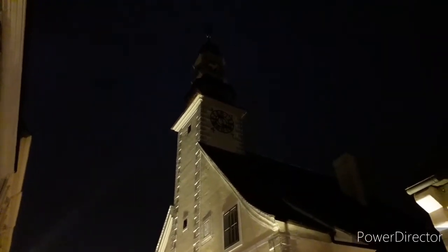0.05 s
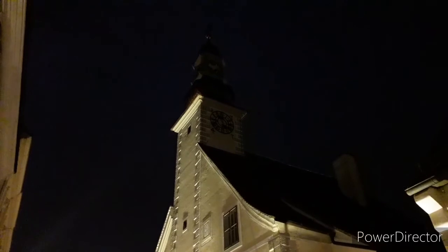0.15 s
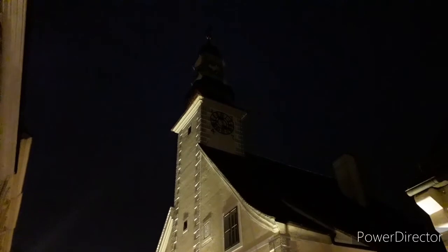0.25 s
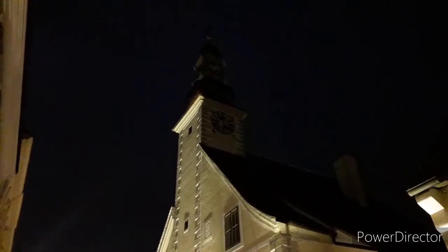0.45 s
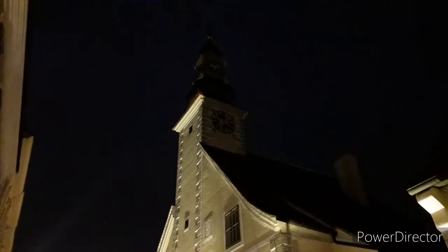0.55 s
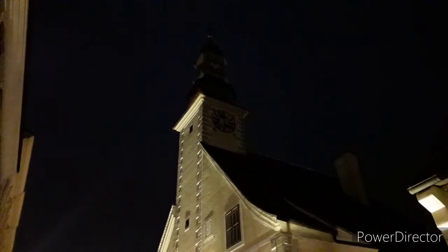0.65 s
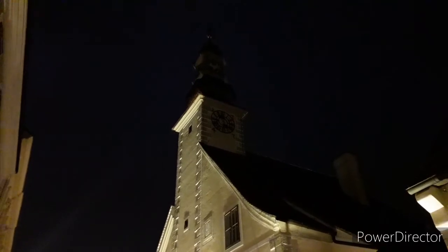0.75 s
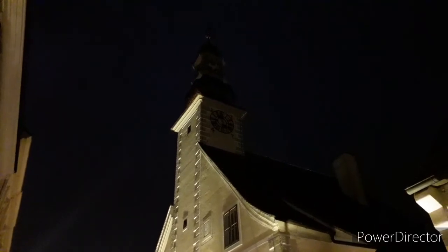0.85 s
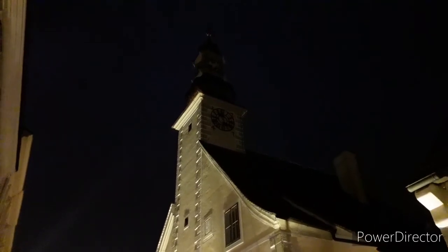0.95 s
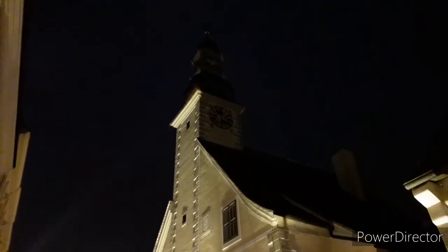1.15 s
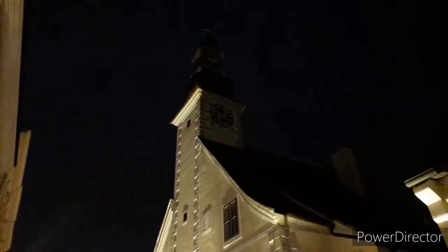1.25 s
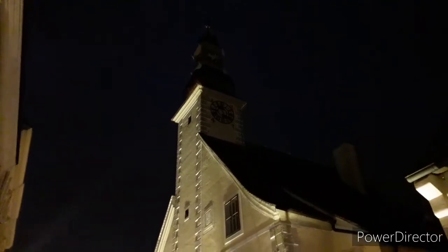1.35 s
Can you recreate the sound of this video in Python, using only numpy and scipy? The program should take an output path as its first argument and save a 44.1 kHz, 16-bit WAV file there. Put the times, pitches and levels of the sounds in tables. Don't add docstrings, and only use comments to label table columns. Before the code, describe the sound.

One hard hammer blow on a church bell, its shimmering ring fading into faint town hush

```python
import sys
import numpy as np
from scipy import signal
from scipy.fft import rfft, irfft
from scipy.io import wavfile
from scipy.ndimage import uniform_filter1d, minimum_filter1d

SR = 44100
rng = np.random.default_rng(int(sys.argv[2]) if len(sys.argv) > 2 else 0)


def elevation(decibels):
    levels = np.asarray(decibels, float)
    return 10 ** (levels / 20)


def master(y):
    cut = np.clip(np.atleast_2d(y).T, -1, 1)
    pcm = np.round(cut * 32767)
    wavfile.write(sys.argv[1], SR, pcm.astype(np.int16))


N = 61739
STRIKE_S, EARLY_S, RISE_S = .2119, .2024, .0014


def read(points, hz):
    f, value = np.transpose(points)
    return np.interp(np.log(hz + 1), np.log(f + 1), value)


def colour(x, points):
    hz = np.fft.rfftfreq(len(x), 1 / SR)
    y = irfft(rfft(x) * elevation(read(points, hz)), len(x))
    return y / np.sqrt(np.mean(y ** 2))


def passed(x, hz, kind, order):
    return signal.sosfilt(signal.butter(order, hz, kind, fs=SR, output="sos"), x)


def since(s):
    return np.maximum(np.arange(N) / SR - s, 0)


def decay(t, db, t60):
    return elevation(db - 60 * t / t60)


def partials(pitches, table):
    hold_s, bloom_depth, twin_gain_db_per_s = .1, .88, 10
    echo_db, echo_end_s, echo_fade_s = -3, .14, .04
    t, out = since(STRIKE_S), np.zeros(N)
    late = np.maximum(t - hold_s, 0)
    starts = rng.uniform(0, 2 * np.pi, len(table))
    for hz, (db, t60, split, share, bloom), start in zip(pitches, table, starts):
        phase = 2 * np.pi * hz * t + start
        twin_level = np.tanh(share * elevation(twin_gain_db_per_s * t))
        twin = twin_level * np.sin(phase + 2 * np.pi * split * t)
        swell = 1 - bloom_depth * np.exp(-t / bloom)
        out += np.sqrt(2) * decay(late, db, t60) * swell * (np.sin(phase) + twin)
    echoes_end = elevation(echo_db * np.clip((t - echo_end_s) / echo_fade_s, 0, 1))
    return out * np.minimum(t / RISE_S, 1) ** 2 * echoes_end


# f/Hz, level/dB
SWARM = [(300, -50.5), (1800, -55), (2300, -53), (7900, -46), (8300, -52.5), (13000, -57.5), (15500, -62)]


def swarm(count=110):
    mean_t60_s, spread_db = .51, 3.5
    place, size, life, split = rng.random((count, 4)).T
    hz = 300 + 15100 * place
    db = read(SWARM, hz) + spread_db * 2 * (2 * size - 1)
    t60 = mean_t60_s * (.6 + .8 * life)
    share, bloom = np.full(count, .4), np.full(count, .01)
    return partials(hz, np.c_[db, t60, 2 + 8 * split, share, bloom])


BELL_HZ = [714.6, 1295.2, 1986.5, 2803.5, 2969.5, 3494.3, 3674, 4039, 4121.7, 4395, 4657, 4880, 5314,
           5777.2]
# level/dB, t60/s, split/Hz, twin share/1, bloom/s
BELL = [(-32.5, 2.98, 1, .15, .02), (-20.6, 1.98, 3.3, .07, .08), (-26, 1.6, 1.6, -.4, .002),
        (-22.1, .95, 1.5, .37, .04), (-19.4, .8, 3, .45, .04), (-17.8, .85, 4.1, .22, .04),
        (-30.5, 1.23, 6.4, -.23, .004), (-33.2, 1.52, 9.1, -.45, .002), (-15, 1.25, 1.9, -.15, .001),
        (-22.5, .85, 8.3, .3, .001), (-30.5, .94, 3.5, .6, .001), (-13.8, .78, 6.8, .27, .06),
        (-31.4, 1.09, 5, .3, .002), (-21, .92, 3, .15, .001)]
LIP_HZ = [6795.5, 7911.5, 2198, 2591, 3199, 5884, 6315, 6691, 7047, 7397, 7736, 7806]
# level/dB, t60/s, split/Hz, twin share/1, bloom/s
LIP = [(-26, .8, 4.3, .3, .004), (-30.6, .79, 3.2, .37, .004), (-34.1, .95, 4.7, .37, .02),
       (-40, .74, 3.4, .6, .004), (-44.2, 1.39, 1.6, .6, .02), (-38.2, 1.12, 1.3, .37, .004),
       (-37.5, .88, 2.4, .37, .1), (-40.6, .85, 4.8, .3, .004), (-33.4, .66, 9.9, -.15, .05),
       (-47.1, 1.2, 7.3, .37, .004), (-39.1, .87, 7.1, .45, .004), (-36.9, .59, 7.5, -.45, .004)]
CROWN_HZ = [8888, 9114, 9284, 10126, 10287, 10372, 10566.5, 11617, 11702, 12608, 13061, 13238, 13884, 14460]
# level/dB, t60/s, split/Hz, twin share/1, bloom/s
CROWN = [(-56.9, 1.13, 5.2, -0.52, 0.004), (-45.7, 0.99, 2.1, -0.6, 0.004), (-45.8, 0.57, 6.9, -0.23, 0.02),
         (-58.5, 0.76, 9.1, 0.6, 0.004), (-46.3, 0.45, 3.6, 0.15, 0.004), (-39.8, 0.76, 4.3, 0.45, 0.05),
         (-43.4, 0.75, 8.8, 0.45, 0.004), (-51.2, 0.61, 1.8, 0.6, 0.004), (-41.5, 0.73, 1.7, -0.23, 0.004),
         (-57.6, 0.71, 2.9, -0.3, 0.004), (-44.1, 0.72, 3.2, 0.22, 0.004), (-53.6, 0.88, 3.1, 0.15, 0.004),
         (-55.5, 0.62, 9.3, -0.23, 0.02), (-57.3, 0.74, 3.8, 0.37, 0.004)]
WAIST_HZ = [267, 2026, 2372, 2392, 2430, 3497]
# level/dB, t60/s, split/Hz, twin share/1, bloom/s
WAIST = [(-45.5, 1.94, 2.7, -0.65, 0.12), (-27, 0.17, 3.5, .3, 0.0049), (-26.5, 1.34, 9, 0.64, 0.03),
         (-21.5, 0.7, 11.64, -0.71, 0.022), (-24.5, 1.03, 7.2, 0.12, 0.016), (-48, 2.8, 1.8, -0.4, .1)]


def bell():
    body = partials(BELL_HZ, BELL) + partials(LIP_HZ, LIP)
    return body + partials(CROWN_HZ, CROWN) + partials(WAIST_HZ, WAIST) + swarm()


# f/Hz, level/dB
CRACK = [(60, -5.5), (300, -2), (1700, -4), (2300, 3), (7900, -2.5), (8300, -18.5), (13000, -15),
         (16000, -48)]


def crack():
    t = since(STRIKE_S)
    noise = colour(rng.standard_normal(N), CRACK)
    return noise * decay(t, -10, .02) * np.minimum(t / RISE_S, 1) ** 2


CLANG_HZ = [165, 330, 2065, 2410, 2810, 3500, 4030, 4600, 5850, 6800, 7780, 10350, 11750]
# level/dB, t60/s
CLANG = [(-31, .03), (-40, .03), (-18, .04), (-11, 0.039), (-15.5, 0.052), (-19.5, 0.061), (-16.5, 0.031),
         (-20.5, 0.034), (-19.5, 0.032), (-41, 0.024), (-21.5, .03), (-50, 0.018), (-32, 0.037)]


def clang():
    t, out = since(STRIKE_S), np.zeros(N)
    for hz, (db, t60) in zip(CLANG_HZ, CLANG):
        swell = 1 - decay(t, 0, t60)
        out += decay(t, db, t60) * swell * 2 * np.sin(2 * np.pi * hz * t)
    return out


# f/Hz, level/dB, t60/s
PING = [
    (2306, -9.5, 0.035),
    (4685, -8.5, 0.028),
    (7170, -22, 0.017),
]


def ping():
    t, out = since(STRIKE_S), np.zeros(N)
    for hz, db, t60 in PING:
        out += decay(t, db, t60) * np.sin(2 * np.pi * hz * t)
    return out * np.minimum(t / RISE_S, 1)


def early_path(direct):
    lead = np.roll(direct, round((EARLY_S - STRIKE_S) * SR))
    return passed(lead * decay(since(EARLY_S), -14, .072), 3500, "high", order=3)


# f/Hz, t60/s
STREET = [(100, 0.58), (400, 0.9), (1800, 1.19), (4800, 0.98), (12800, 0.4)]


def street(x):
    hold_s = .05
    hz, t, z = signal.stft(rng.standard_normal(N), SR, nperseg=256)
    late = np.maximum(t - hold_s, 0)
    fading = z * decay(late, 0, read(STREET, hz)[:, None])
    tail = signal.istft(fading, SR, nperseg=256)[1]
    return signal.fftconvolve(x, tail / np.linalg.norm(tail))[:N]


# f/Hz, level/dB (per Hz)
HUSH = [(30, -28), (100, -3.5), (570, -3.5), (1000, -6), (3000, -7.5), (7700, -16.5), (8500, -26.5),
        (16000, -39)]


def hush():
    level_db, patch_db, duck_db, duck_s = -45.5, .8, -4.5, .6
    z = signal.stft(colour(rng.standard_normal(N + 2048), HUSH), nperseg=512)[2]
    patch = uniform_filter1d(rng.standard_normal(z.shape), size=8, axis=0)
    patch = uniform_filter1d(patch, size=8, axis=1)
    x = signal.istft(z * elevation(patch_db * patch / patch.std()), nperseg=512)[1][:N]
    return x * elevation(level_db + duck_db * np.minimum(since(STRIKE_S) / duck_s, 1))


def scene():
    hammer_dry_db, hammer_wet_db, bell_wet_db = 2.5, 7.5, -24
    ringing = bell()
    hammer = crack() + clang()
    direct = ringing + elevation(hammer_dry_db) * hammer + ping()
    wet = street(elevation(hammer_wet_db) * hammer + elevation(bell_wet_db) * ringing)
    strike = direct + wet + early_path(direct)
    return (passed(strike, 105, "high", order=4) + hush())[None]


def roll_off(x):
    return signal.sosfilt(signal.butter(12, 16470, fs=SR, output="sos"), x)


def record(dry):
    limit_db, recover_db_per_s = -.1, 60
    x = passed(dry, 15600, "low", order=12)
    peak_db = -minimum_filter1d(-20 * np.log10(abs(x[0]) + 1e-9), size=201)
    fall = np.arange(N) * recover_db_per_s / SR
    held_db = np.maximum.accumulate(peak_db + fall) - fall
    over_db = np.maximum(held_db - limit_db, 0)
    mix = x / elevation(uniform_filter1d(over_db, size=200))
    return roll_off(mix)


dry = scene()
out = record(dry)
master(out)
```